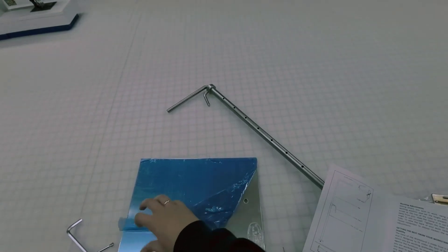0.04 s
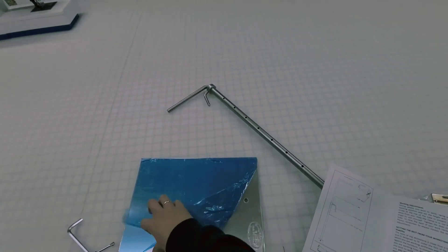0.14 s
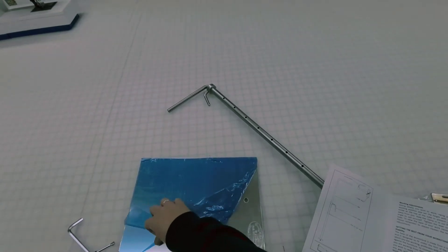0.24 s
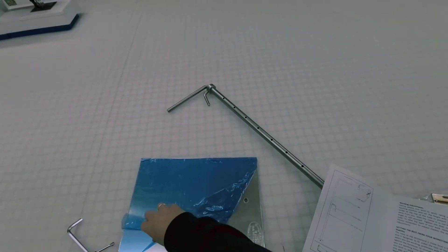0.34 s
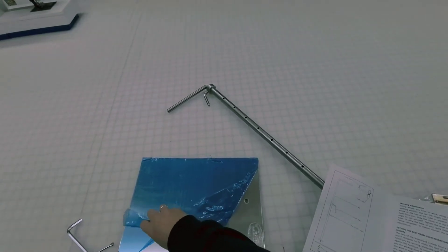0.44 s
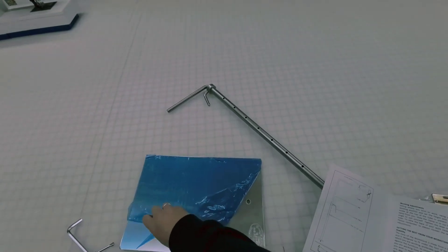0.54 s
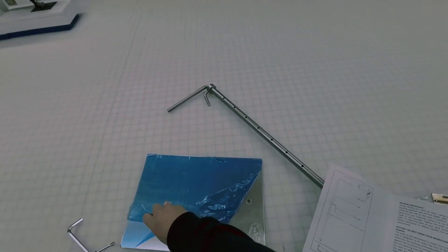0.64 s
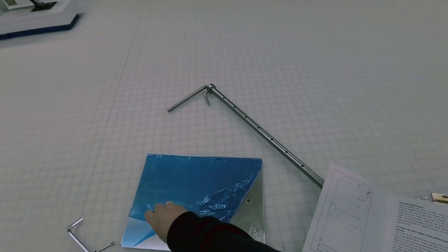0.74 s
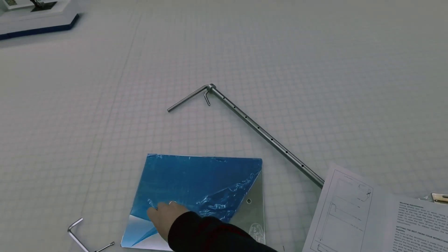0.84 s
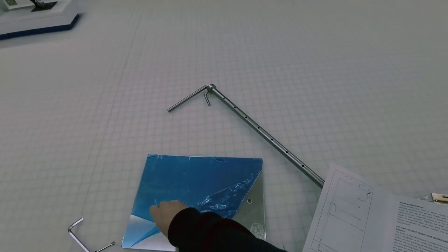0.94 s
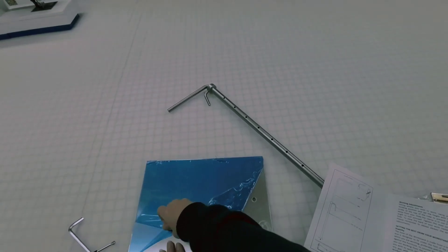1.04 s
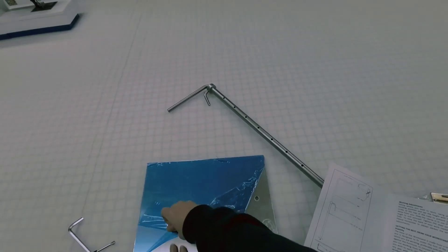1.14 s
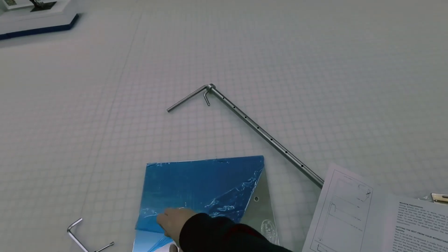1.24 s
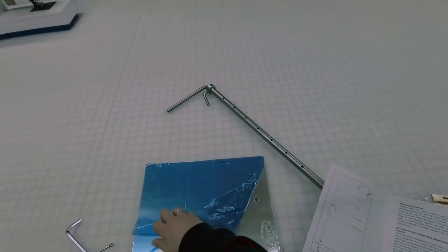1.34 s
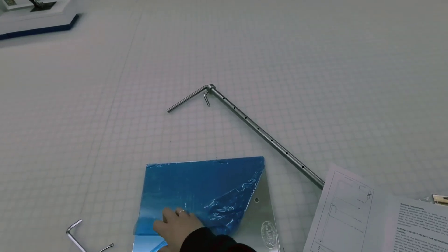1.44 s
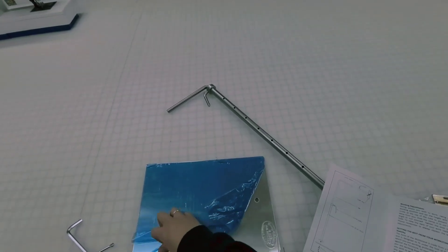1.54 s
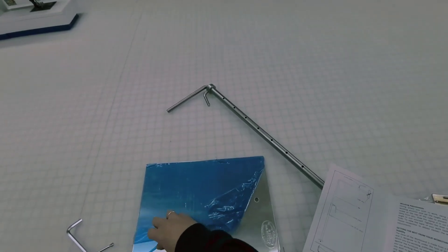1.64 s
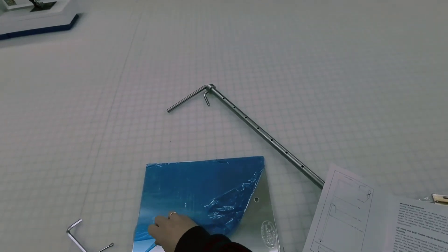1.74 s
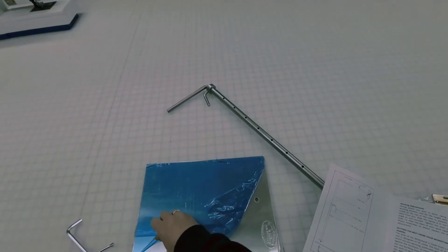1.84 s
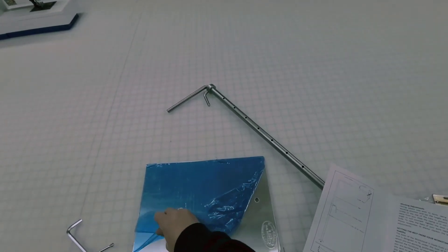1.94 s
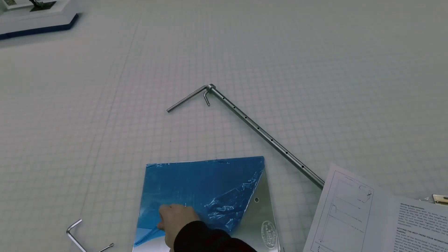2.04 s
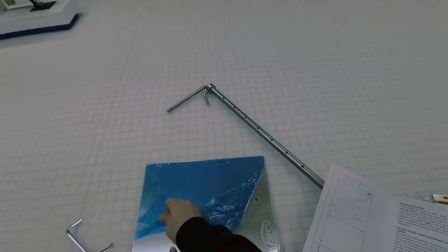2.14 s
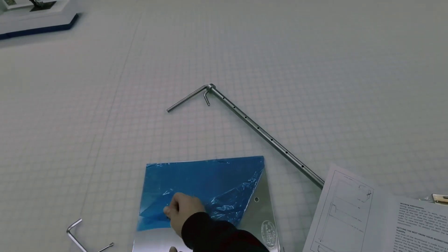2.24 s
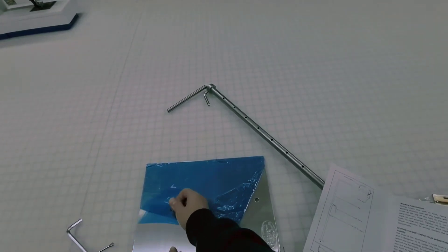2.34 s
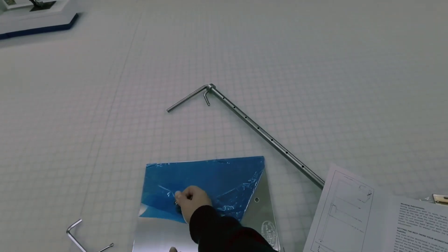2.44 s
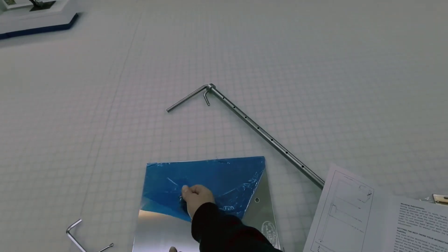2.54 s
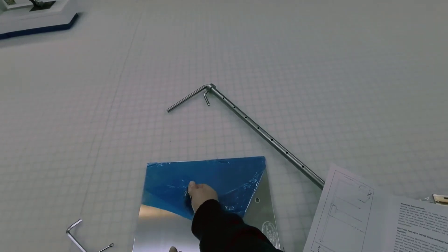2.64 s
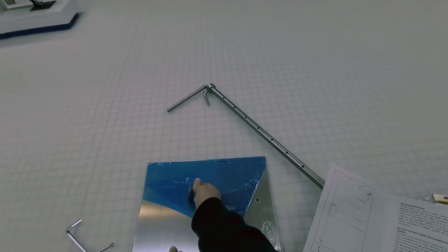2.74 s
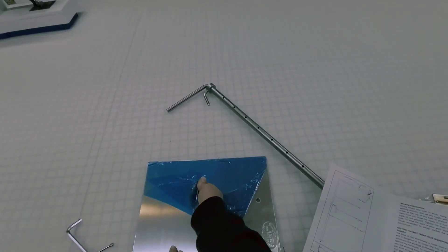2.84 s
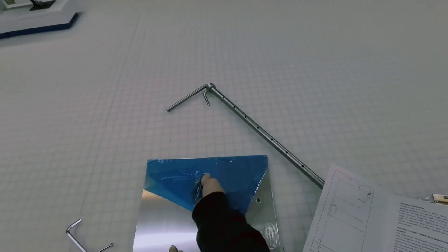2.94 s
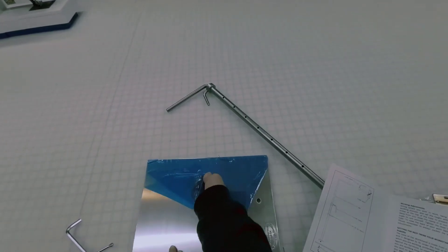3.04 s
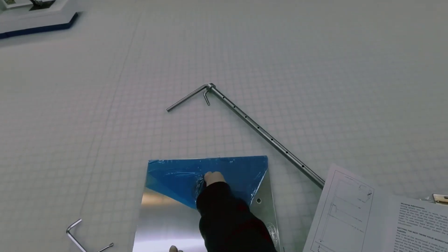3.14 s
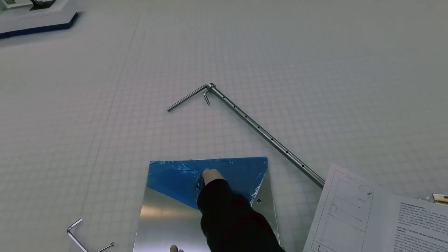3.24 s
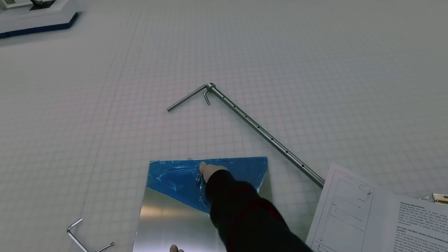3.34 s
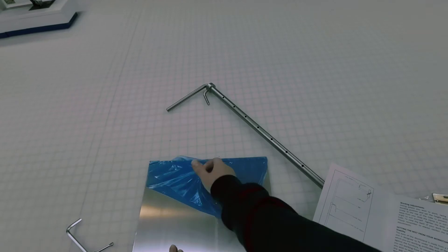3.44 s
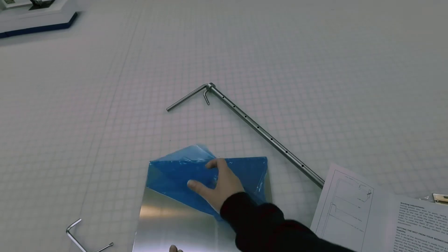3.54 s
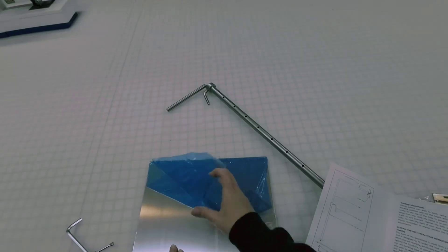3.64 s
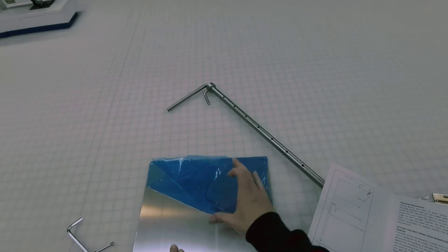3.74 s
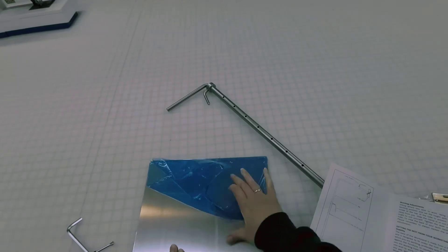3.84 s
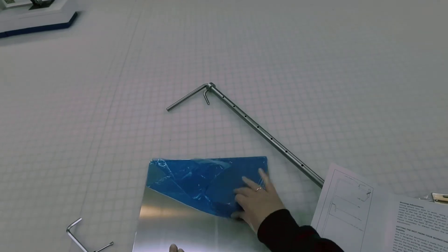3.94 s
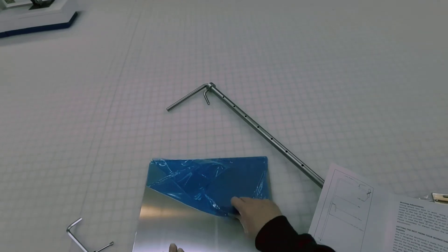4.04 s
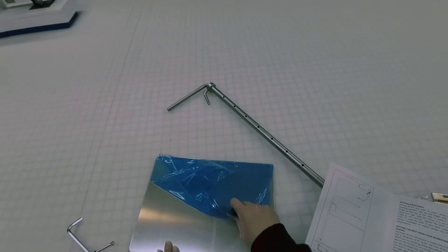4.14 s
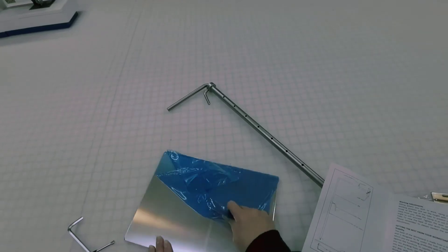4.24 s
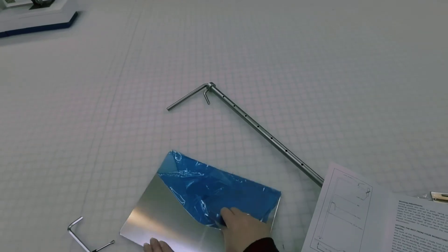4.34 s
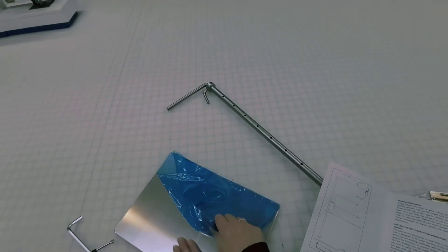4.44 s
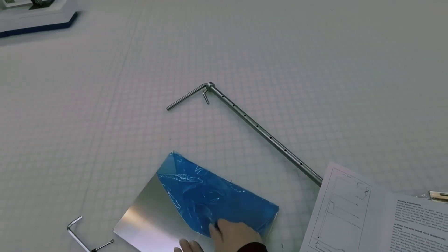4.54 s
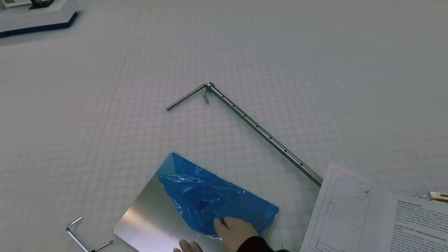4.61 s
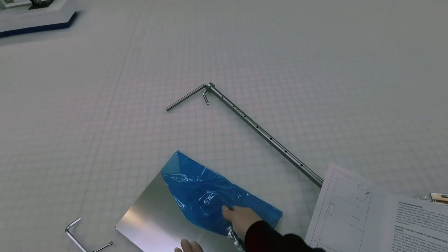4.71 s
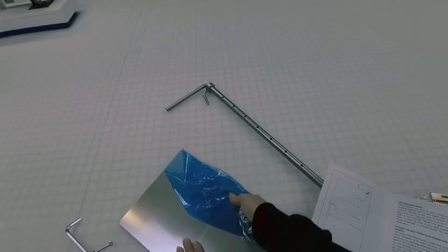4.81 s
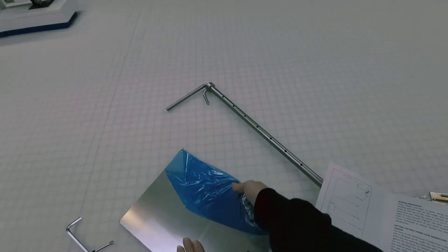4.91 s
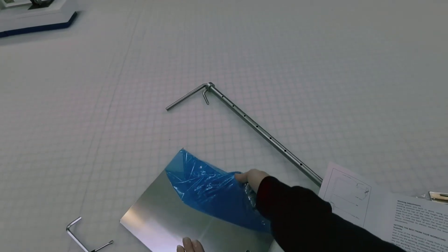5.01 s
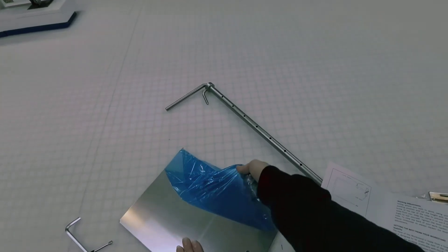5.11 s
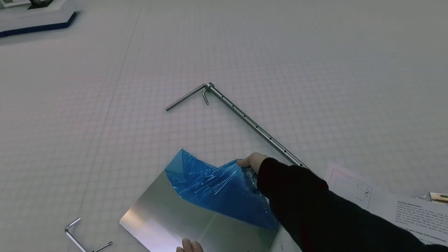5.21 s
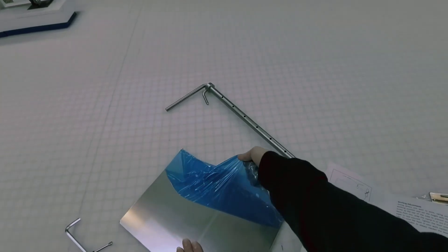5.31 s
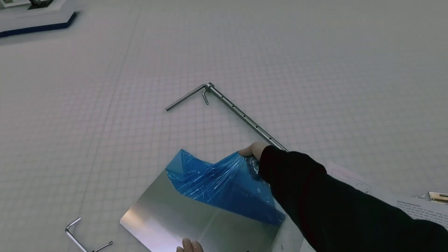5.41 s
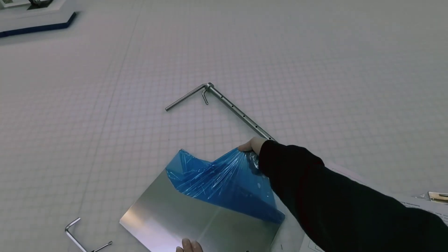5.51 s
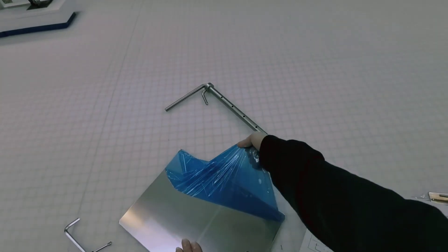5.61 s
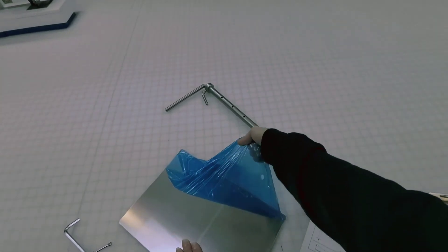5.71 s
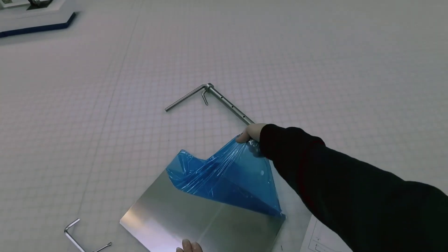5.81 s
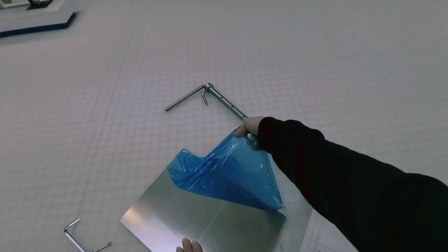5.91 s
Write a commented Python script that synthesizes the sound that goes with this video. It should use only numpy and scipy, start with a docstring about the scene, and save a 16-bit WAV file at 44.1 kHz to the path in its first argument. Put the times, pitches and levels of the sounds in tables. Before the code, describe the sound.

Close stereo pickup in a small workroom with low ventilation rumble and faint mains hum. Film is picked loose from a metal plate in short crackling tugs with sharp snaps, then peeled in a long scratchy pull and a short rip. The plate scrapes and knocks on the bench as it is turned, and a final fizzing pull runs to the end.

```python
"""Small humming room, workbench: protective film is peeled off a thin metal plate in short tugs and three pulls,
the middle one a short rip. Crackle is random slips shaped by pull speed; creases add snaps, and a gliding
resonator is the freed film's ring. Slips and snap kicks drive the plate's modes. Before the last pull the
plate is turned, scraping and knocking on the bench. A moving source feeds two microphones; changing noise
echoes form the room's answer."""
import sys
import numpy as np
from scipy import signal
from scipy.fft import rfft, irfft, next_fast_len
from scipy.io import wavfile
from scipy.ndimage import uniform_filter1d, map_coordinates

SR = 44100
rng = np.random.default_rng(int(sys.argv[2]) if len(sys.argv) > 2 else 0)


def output_pcm(signal):
    """Save a mono or channel-first signal as 16-bit PCM at the path in sys.argv[1].

    Samples are clipped to [-1, 1] before scaling.
    """
    pcm = np.clip(np.atleast_2d(signal).T, -1, 1) * 32767
    wavfile.write(sys.argv[1], SR, np.round(pcm).astype(np.int16))


N = 263321

# spectrum of a film slip or crack: (frequency [Hz], relative density [dB per Hz])
FILM_SPECTRUM = [(250, -36), (700, -23), (1000, -11), (1400, -7), (2100, -5), (3400, 1), (5000, -1.5),
                 (7500, -2), (11000, -1), (15000, 1), (17000, -0.5), (20000, -19)]
# three pulls, the middle one a short rip, a list each, before the gains in hand():
# (time [s], crackle [dB], plate shaking [dB], top sizzle re crackle [dB])
PULL_CURVES = [
    [(2.01, -32.5, -51, -2), (2.106, -26.5, -52, -2), (2.28, -29, -51.5, -2.5), (2.676, -30, -43.5, 0.5),
     (2.718, -30, -54, 0), (2.864, -27.5, -42, -5.5), (3.054, -32.5, -47, 0.5), (3.2, -53.5, -63, 1)],
    [(3.21, -39, -59, 7), (3.23, -38.5, -51, -7), (3.344, -38, -50, -2), (3.518, -27, -40.5, 2.5),
     (3.608, -39.5, -54, 7), (3.622, -34, -48, 3), (3.722, -56, -60.5, 0), (3.74, -64, -58, 5)],
    [(4.42, -46, -56, -6), (4.466, -44, -55, 5), (4.526, -34.5, -44.5, -1), (4.562, -36.5, -44, 5),
     (4.648, -30.5, -41.5, 6.5), (5.144, -31.5, -44.5, 3), (5.862, -35, -45, 6.5), (5.97, -30.5, -41, 4.5)],
]


def amp(db):
    """Decibels to gain."""
    return 10 ** (np.asarray(db) / 20)


def unit(x):
    """Scale to rms 1."""
    return x / np.sqrt(np.mean(x ** 2) + 1e-20)


def along(points, hz):
    """Interpolate (Hz, value) points on a log frequency axis."""
    f, v = np.transpose(points)
    return np.interp(np.log(hz + 1), np.log(f + 1), v)


def curves(rows):
    """One value per sample for each column after the time."""
    s, *cols = np.transpose(rows)
    return [np.interp(np.arange(N) / SR, s, c) for c in cols]


def wobble(knots_per_s):
    """Smooth random curve through normally distributed knots."""
    knots = rng.standard_normal(int(N * knots_per_s / SR) + 4)
    return map_coordinates(knots, [np.arange(N) * knots_per_s / SR])


def filtered(x, response):
    """Multiply the spectrum of x by a response of frequency."""
    m = next_fast_len(x.shape[-1] + SR // 2)
    spectrum = rfft(x, m) * response(np.fft.rfftfreq(m, 1 / SR))
    return irfft(spectrum, m)[..., :x.shape[-1]]


def coloured(x, spectrum, size=2048):
    """Minimum-phase filter of energy 1 with the given spectrum."""
    cepstrum = irfft(np.log(amp(along(spectrum, np.fft.rfftfreq(size, 1 / SR)))))
    # fold onto positive time: causal
    cepstrum[1:size // 2] *= 2
    cepstrum[size // 2 + 1:] = 0
    kernel = irfft(np.exp(rfft(cepstrum)))
    return signal.fftconvolve(x, kernel / np.linalg.norm(kernel))[:N]


def resonance(f, hz, width_hz):
    """Response of one damped mode, gain 1 at its centre."""
    return 1j * f * width_hz / (hz * hz - f * f + 1j * f * width_hz)


def slips(rate_per_s, spread_db):
    """Stick-slip releases: random impulses of uneven size and sign, rms 1."""
    fired = rng.random(N) < rate_per_s / SR
    size = amp(spread_db * np.clip(rng.standard_normal(N), -2, 2))
    size = size * rng.choice([-1, 1], N)
    return unit(fired * size / np.sqrt(rate_per_s))


def burst(seed_t60_s, size=4096):
    """Dying noise puff with an even spectrum before its last fade, starting near peak 1."""
    fall = amp(-60 * np.arange(size) / SR / seed_t60_s)
    phase = np.angle(rfft(rng.standard_normal(size) * fall))
    puff = irfft(np.exp(1j * phase)) * np.sqrt(fall)
    return 0.5 * puff * np.linalg.norm(fall) / np.linalg.norm(puff)


def add(track, s, sound):
    """Mix a sound into a track at time s, in place."""
    part = track[max(round(s * SR), 0):][:len(sound)]
    part += sound[:len(part)]


def diffuse(pair):
    """Give two unrelated signals the left-right likeness of a diffuse field, strongest in the bass."""
    # (frequency [Hz], left-right correlation)
    likeness = [(60, 0.99), (300, 0.92), (1000, 0.33), (2200, 0.17), (4000, 0), (15000, 0.36)]

    def mid_side(hz):
        angle = np.arccos(np.clip(along(likeness, hz), -1, 1)) / 2
        return np.array([np.cos(angle), np.sin(angle)])

    mid, side = filtered(pair, mid_side)
    return np.array([mid + side, mid - side])


def floor(air_db=-47.0, hum_db=-55, mains_hz=60):
    """Ventilation rumble as coloured diffuse noise, plus a mains hum as a sine."""
    # rumble: (frequency [Hz], relative density [dB per Hz])
    air_spectrum = [(20, -26), (35, -11), (55, 2.5), (85, -3), (130, -9.5), (250, -10), (400, -14),
                    (550, -21), (1000, -28.5), (4000, -54), (15000, -32)]
    noises = [coloured(rng.standard_normal(N), air_spectrum) for _ in range(2)]
    air = diffuse(np.array(noises))
    hum = np.sin(2 * np.pi * mains_hz * np.arange(N) / SR)
    return amp(air_db) * unit(air) + amp(hum_db) * hum


def room(early_db=-8, late_db=-6, early_t60_s=0.1, gap_s=0.004):
    """Echo of one spot: bench and walls scatter sparse early noise, and a diffuse tail decays by frequency."""
    # reverberation: (frequency [Hz], T60 [s])
    tail_decay = [(200, 0.37), (1500, 0.27), (6000, 0.28), (15000, 0.22)]
    hz = np.fft.rfftfreq(256, 1 / SR)
    frame_s = np.arange(128) * 128 / SR
    noise = rng.standard_normal((2, len(hz), len(frame_s), 2)) @ [1, 1j]
    fall = amp(-60 * frame_s / along(tail_decay, hz)[:, None])
    tail = signal.istft(noise * fall, SR)[1]
    t = np.arange(tail.shape[1]) / SR
    # the product of two noises is spiky, like separate reflections
    walls = rng.standard_normal(tail.shape) * rng.standard_normal(tail.shape)
    walls *= amp(-60 * t / early_t60_s)
    early = amp(early_db) * walls / np.linalg.norm(walls[0])
    late = amp(late_db) * tail / np.linalg.norm(tail[0])
    return np.pad(early + late, ((0, 0), (int(gap_s * SR), 0)))


def radiate(near, roomward, direct_db=-1.5, wander_ms=0.041, size=8192):
    """The tear moves: direct sound shifts between two microphones, and each block gets its own echo."""
    # where the film lets go: (time [s], mean lead of the left side [ms], left-right level [dB])
    place = [(0, 0.079, 1.3), (2.3, 0.1, 1.1), (3.3, 0.039, 0.8), (4.2, 0.046, 0.8), (4.8, -0.027, 0.2),
             (5.97, -0.019, -0.5)]
    lead_ms, pan_db = curves(place)
    sides, clock = np.array([[1], [-1]]) / 2, np.arange(N)
    lead_samples = (lead_ms + wander_ms * wobble(40)) * SR / 1000
    direct = np.array([map_coordinates(near, [clock + side * lead_samples], order=5) for side in sides])
    echo, hop = np.zeros((2, N)), size // 2
    padded = np.pad(roomward, (hop, size))
    # unrelated echoes add in power, hence the sine fades
    fade = np.sin(np.pi * np.arange(size) / size)
    for start in range(0, N + hop, hop):
        block = padded[start:start + size] * fade
        answer = signal.fftconvolve([block], room(), axes=1)
        for channel, sound in zip(echo, answer[:, max(hop - start, 0):]):
            add(channel, (start - hop) / SR, sound)
    return (amp(direct_db) * direct + diffuse(echo)) * amp(sides * pan_db)


def knocks(level_db=-2, seed_t60_s=0.044):
    """The plate's edge drops on the bench: noise bursts with the spectrum of a thud."""
    # taps: (time [s], level before level_db [dB])
    taps = [(0.479, -28), (1.456, -24.5), (1.605, -24.5), (3.91, -27), (3.934, -20.5), (3.995, -24),
            (4.118, -21), (4.389, -20), (4.49, -28), (4.511, -20)]
    # plate on bench: (frequency [Hz], relative density [dB per Hz])
    thud_spectrum = [(80, -4.5), (220, -6), (400, 1.5), (620, -1), (900, -8), (2500, -51), (10000, -73)]
    blows = np.zeros(N)
    for s, db in taps:
        add(blows, s, amp(db + level_db) * burst(seed_t60_s))
    return coloured(blows, thud_spectrum)


def skids(relative_width=0.33):
    """Short rasps of film, fingers and plate, and at 2.68 s the lifted plate's low drumming:
    grains swell and fade around one pitch."""
    # rasps and the drumming: (centre time [s], swell length [s], pitch [Hz], level before the swell [dB])
    swells = [(0.03, 0.13, 1630, -45.5), (0.042, 0.043, 770, -45), (1.018, 0.099, 590, -44.5),
              (1.019, 0.02, 1340, -31), (1.02, 0.023, 11900, -37), (1.831, 0.014, 2150, -34),
              (1.94, 0.12, 1370, -46), (1.917, 0.025, 12000, -29), (2.146, 0.023, 1310, -32.5),
              (2.68, 0.35, 403, -45), (3.254, 0.041, 1520, -38), (3.533, 0.038, 3400, -31),
              (3.998, 0.069, 1340, -35.5), (4.019, 0.028, 2420, -26), (4.17, 0.074, 596, -41),
              (4.356, 0.065, 1450, -33), (4.373, 0.026, 840, -33), (5.345, 0.008, 1260, -24.5)]
    t, out = np.arange(N) / SR, np.zeros(N)
    grains = slips(1500, spread_db=3)
    for s, length_s, hz, db in swells:
        near = np.abs(t - s) < 2 * length_s
        pitched = filtered(grains[near], lambda f: resonance(f, hz, relative_width * hz) ** 2)
        swell = np.exp(-2 * ((t[near] - s) / length_s) ** 2)
        out[near] += unit(pitched) * amp(db) * swell
    return out


def plate(shake, kicks, rub_db=-2, ring_db=-3, shift_db=3, shift_per_s=7, uneven_db=1.5, uneven_per_s=14):
    """Friction grains and kicks sound the plate; the moving hand and tear favour now one mode, now another."""
    # broad response: (frequency [Hz], relative density [dB per Hz])
    body_spectrum = [(120, -16.5), (250, -4), (420, -1.5), (750, -4), (1050, 2), (1500, 3.5), (2500, -7.5),
                     (5000, -12), (12000, -54)]
    # (frequency [Hz], width [Hz], relative level [dB])
    plate_modes = [(414, 19, -24), (605, 16, 5.5), (939, 19, 5), (1298, 81, 6), (1650, 35, -11),
                   (1673, 45, 5), (1904, 190, 9), (2015, 32, 7.5), (2350, 32, -11), (2580, 110, 8)]
    rub = slips(900, spread_db=3) * shake * amp(rub_db + uneven_db * wobble(uneven_per_s))
    force = rub + kicks

    def mode_responses(f):
        return np.array([amp(db) * resonance(f, hz, width_hz) for hz, width_hz, db in plate_modes])

    modes = filtered(force, mode_responses)
    ring = sum(mode * amp(shift_db * np.tanh(wobble(shift_per_s))) for mode in modes)
    return coloured(force, body_spectrum) + unit(ring) * force.std() * amp(ring_db)


def taut_film(pulls, pole_hz=500, level_db=-3, flutter_hz=80, flutter_per_s=25, swell_s=0.3, glide_s=0.41):
    """Slips pluck the freed film, a wavering resonator whose note glides, mostly down, as it lengthens."""
    # a row per pull: (first note [Hz], last note [Hz], level re crackle before level_db [dB], fade [dB/s])
    film_notes = [(2430, 1600, 2, 11.5), (2020, 2100, -8.5, 17), (3700, 3330, -11.5, 0)]
    out, pole = np.zeros(N), np.exp(-2 * np.pi * pole_hz / SR)
    for rows, pull, (first_hz, last_hz, db, fade_db_per_s) in zip(PULL_CURVES, pulls, film_notes):
        t = np.maximum(np.arange(N) / SR - rows[0][0], 0)  # time since the pull began
        hz = last_hz + (first_hz - last_hz) / (1 + (t / glide_s) ** 3)
        cycles = np.cumsum(hz + flutter_hz * wobble(flutter_per_s)) / SR
        carrier = np.exp(2j * np.pi * cycles)
        # shift the note to 0 Hz, resonate there, shift back
        plucks = slips(800, spread_db=0) / carrier
        ring = signal.lfilter([1], np.poly([pole, pole]), plucks) * carrier
        pressure = np.gradient(ring.real) / hz  # a light film radiates little bass
        tension = np.minimum(t / swell_s, 1)  # film drawn taut
        out += unit(pressure) * pull * tension * amp(db + level_db - fade_db_per_s * t)
    return out


def snaps(level_db=2, crack_t60_s=0.013, pop_t60_s=0.007, pop_hz=1800, pop_width_hz=1600, kick_db=-12):
    """Creases and glue spots break: a sharp crack, a resonant pop of the film around it, a kick to the plate."""
    # (time [s], crack before level_db [dB], kick driving the pop, added to that crack level [dB])
    breaks = [(0.0112, -20.5, 7.5), (0.2593, -17, -16), (0.3034, -14, -20), (0.389, -15, -3),
              (0.479, -8.5, -5.5), (0.657, -14.5, -12), (0.681, -12, -12), (0.757, -15, -5.5),
              (0.8642, -19, -2), (0.9714, -18, -4), (1.004, -11, -5), (1.017, -5, -7), (1.1281, -13.5, -6),
              (1.1943, -25, -12), (1.2652, -16, -21), (1.4563, -11, -2), (1.494, -13, -2),
              (1.526, -12, -27), (1.587, -10.5, -19), (1.6304, -5.5, -18), (1.651, -16, -6),
              (1.8176, -14.5, -5), (1.832, -10.5, -8), (1.8566, -7.5, -28), (1.9464, -8.5, -20),
              (1.977, -8, -18), (2.003, -3.5, -29), (2.0295, -10, -8), (2.056, -2, -23),
              (2.0686, -7.5, -13), (2.102, -2, -8), (3.1541, -17.5, 2.5), (3.2359, -13, 7),
              (3.2555, -14.5, -11), (3.3065, -14, 6), (3.336, -19, 6), (3.427, -12.5, 8.5), (3.509, -6, -5),
              (3.55, -8.5, -4), (4.116, -12.5, -18), (4.1602, -9, -9), (4.1752, -6.5, -20),
              (4.1859, -5, -22), (4.2012, -10, -14), (4.2193, -16, -4), (4.5288, -8, -9), (5.341, -7, -4),
              (5.4533, -13.5, 3), (5.5503, -16, 6)]
    cracks, kicks = np.zeros(N), np.zeros(N)
    for s, db, pop_db in breaks:
        add(cracks, s + 0.0007, amp(db + level_db) * burst(crack_t60_s))
        add(kicks, s + 0.000697, amp(db + pop_db) * burst(pop_t60_s))
    pops = 3.35 * filtered(kicks, lambda f: resonance(f, pop_hz, pop_width_hz) ** 2)
    return coloured(cracks, FILM_SPECTRUM) + pops, amp(kick_db) * kicks


def stroke(start_s, hold_s, attack_s=0.0031, release_db_per_s=439):
    """Gain of one hand movement: it takes hold at once, keeps on, and lets go."""
    t = np.arange(N) / SR - start_s
    release = amp(-release_db_per_s * np.maximum(t - hold_s, 0))
    return np.clip(t / attack_s, 0, 1) * release


def hand(tear_db=8.5, shake_db=8.0, top_db=-4.0, tug_sizzle_db=-3.5):
    """Tugs and pulls add in power; returns gains of each pull, whole tear, sizzling top and plate shaking."""
    # short tugs at the film: (start [s], hold [s], crackle [dB], plate shaking [dB])
    tugs = [(0.0, 0.0067, -35, -41), (0.13, 0.067, -45, -60), (0.196, 0.016, -33, -53),
            (0.286, 0.05, -38.5, -51), (0.369, 0.018, -25.5, -46), (0.475, 0.017, -34.5, -62),
            (0.666, 0.033, -33, -43), (0.72, 0.037, -42, -56), (0.861, .09, -39.5, -54),
            (0.963, .04, -32.5, -50), (1.005, 0.034, -19, -43), (1.125, 0.2, -38, -53.5),
            (1.253, 0.034, -28, -40.5), (1.304, 0.038, -32, -46), (1.382, 0.014, -37.5, -48),
            (1.455, 0.038, -33, -46), (1.521, 0.028, -31.5, -59), (1.582, 0.077, -27.5, -49.5),
            (1.701, 0.07, -33.5, -50.5), (1.858, 0.09, -27.5, -57), (1.897, 0.026, -21, -52),
            (2.006, 0.022, -30, -50), (3.76, 0.19, -53.5, -60.5), (3.902, 0.033, -28.5, -34.5),
            (3.958, 0.15, -29, -37.5), (4.116, 0.11, -26, -37), (4.262, .11, -29, -38.5),
            (4.317, 0.023, -31, -31.5)]
    pulls, tear, top, shake = [], 0, 0, 0
    for start_s, hold_s, db, plate_db in tugs:
        grip = stroke(start_s, hold_s)
        tear += (grip * amp(db)) ** 2
        top += (grip * amp(db + tug_sizzle_db)) ** 2
        shake += (grip * amp(plate_db)) ** 2
    for rows in PULL_CURVES:
        db, plate_db, sizzle_db = curves(rows)
        grip = stroke(rows[0][0], rows[-1][0] - rows[0][0])
        pull = grip * amp(db + tear_db)
        pulls.append(pull)
        tear += pull ** 2
        top += (pull * amp(sizzle_db + top_db)) ** 2
        shake += (grip * amp(plate_db + shake_db)) ** 2
    return pulls, np.sqrt(tear), np.sqrt(top), np.sqrt(shake)


def crackle(pulls, tear, sizzle, halting_db=6.0, jerks_per_s=170, fizz=0.29, sizzle_hz=8500, tick_db=-9):
    """Glue lets go in slips over a fine fizz; a slow peel halts and ticks, a fast one sizzles evenly."""
    slow_per_s, added_per_s = 450, 4500  # slips while the glue sticks; extra at full speed
    full_speed_db, tug_speed = -20, 0.2  # pull gain at full speed; speed share of the whole tear
    speed = np.minimum((sum(pulls) + tug_speed * tear) / amp(full_speed_db), 1)
    rate_per_s = slow_per_s + added_per_s * speed ** 2
    slowness = slow_per_s / rate_per_s
    grains = slips(rate_per_s, spread_db=5.0) + fizz * rng.standard_normal(N)
    grains *= amp(halting_db * slowness ** 1.2 * np.clip(wobble(jerks_per_s), -2, 2))
    # even out the local power: jerks only bunch the work of the pull
    grains /= np.sqrt(np.abs(uniform_filter1d(grains ** 2, size=1400)) + 1e-9)
    ticks = amp(tick_db) * slowness ** 1.9 * slips(64, spread_db=-1.5)
    sound = coloured(grains + ticks, FILM_SPECTRUM)
    top = filtered(sound, lambda f: f ** 4 / (f ** 4 + sizzle_hz ** 4))
    return tear * (sound - top) + sizzle * top


def scene(snap_room_db=-4.5):
    """Film and plate sound together; the snaps face the microphones and send less into the room."""
    pulls, tear, sizzle, shake = hand()
    snap_sound, kicks = snaps()
    rest = knocks() + skids() + plate(shake, kicks) + taut_film(pulls) + crackle(pulls, tear, sizzle)
    return floor() + radiate(rest + snap_sound, rest + amp(snap_room_db) * snap_sound)


def record(dry, top_hz=15950):
    """Steep low-pass at the band limit."""
    return filtered(dry, lambda hz: 1 / (1 + (hz / top_hz) ** 400))


dry = scene()
out = record(dry)
output_pcm(out)
```